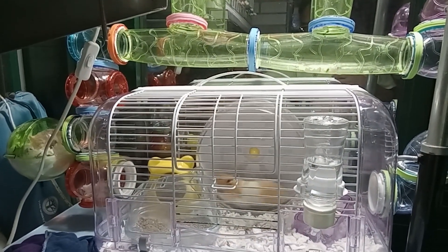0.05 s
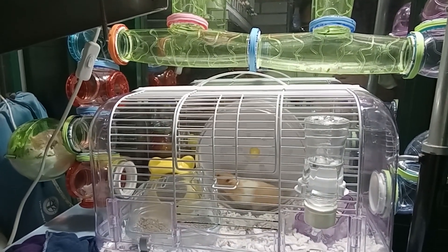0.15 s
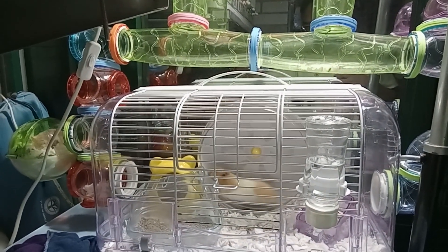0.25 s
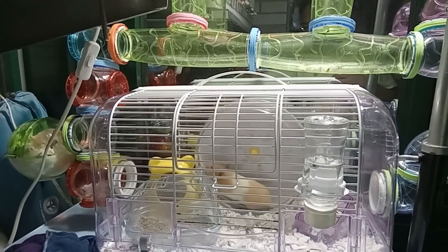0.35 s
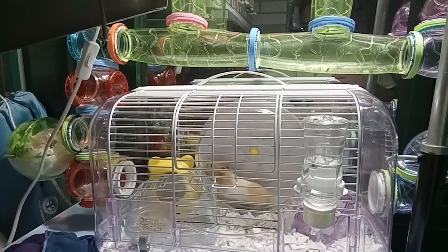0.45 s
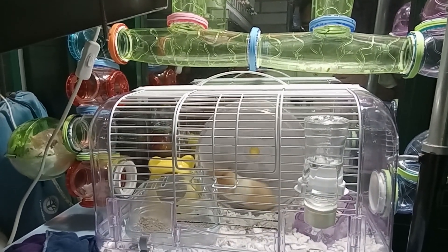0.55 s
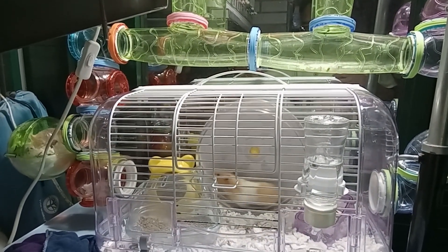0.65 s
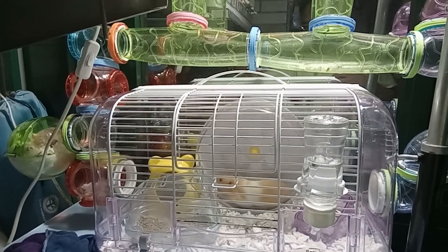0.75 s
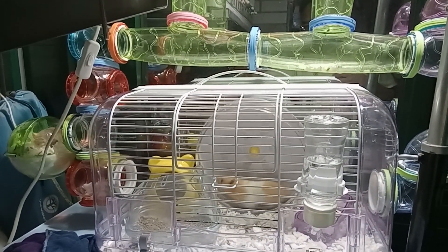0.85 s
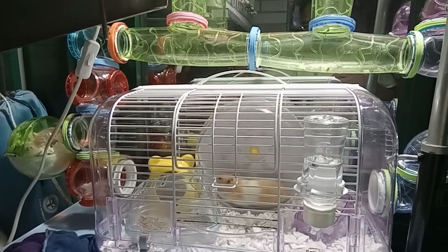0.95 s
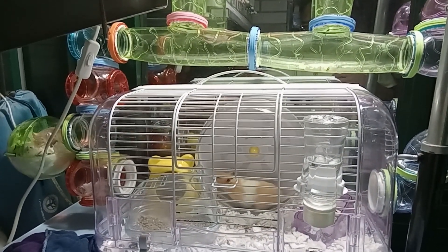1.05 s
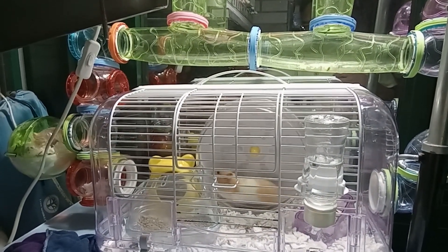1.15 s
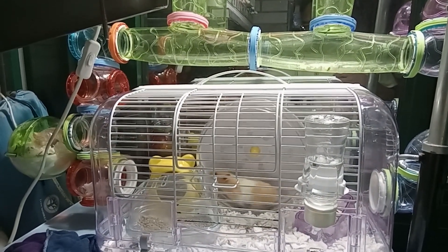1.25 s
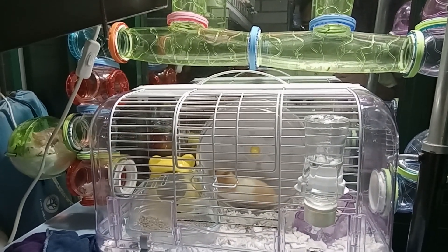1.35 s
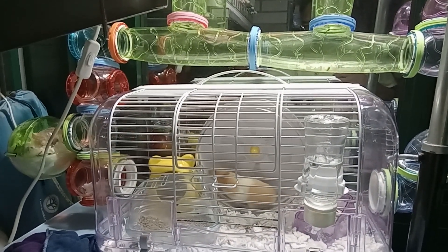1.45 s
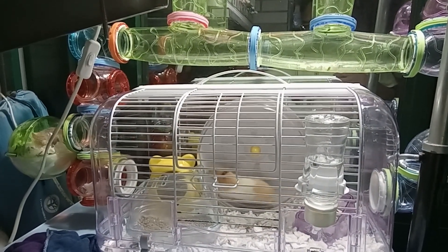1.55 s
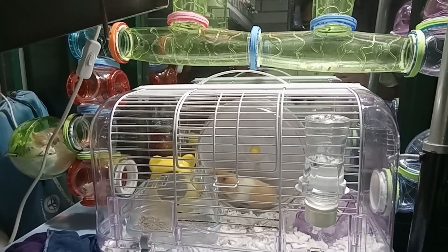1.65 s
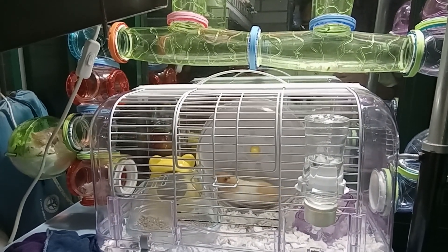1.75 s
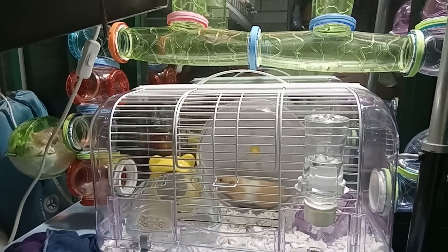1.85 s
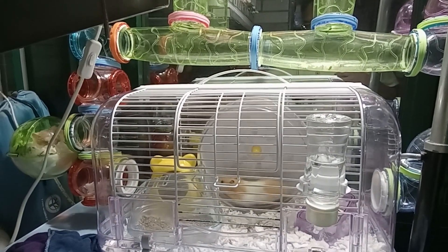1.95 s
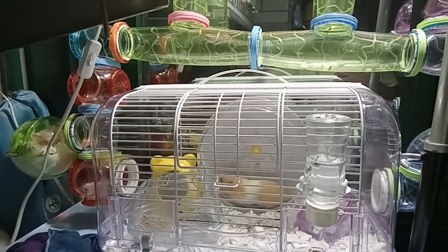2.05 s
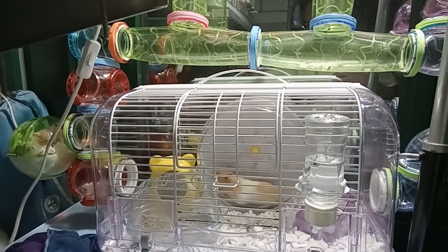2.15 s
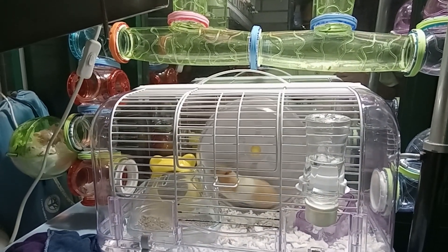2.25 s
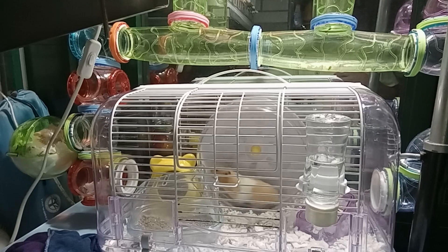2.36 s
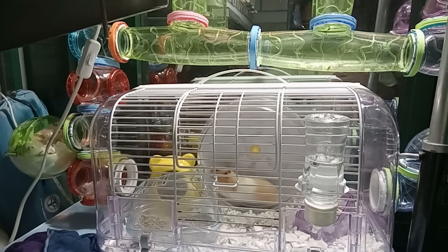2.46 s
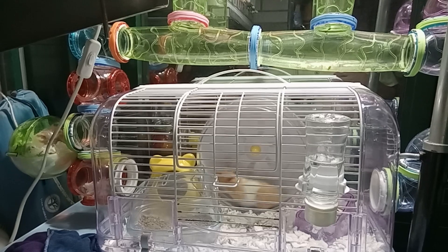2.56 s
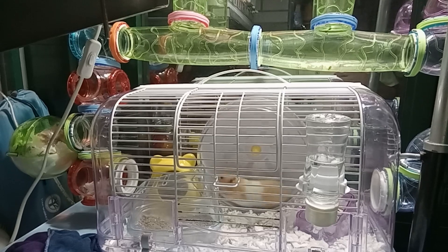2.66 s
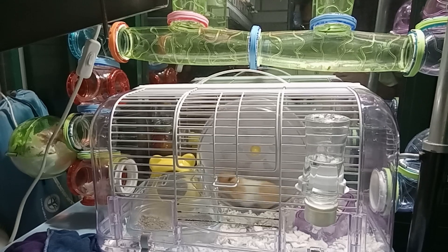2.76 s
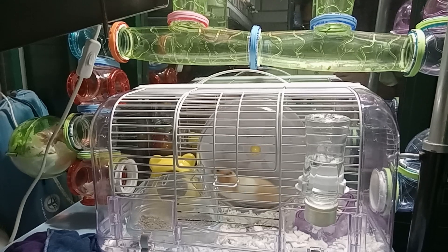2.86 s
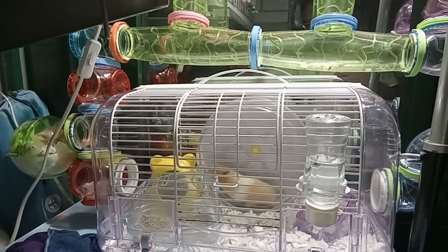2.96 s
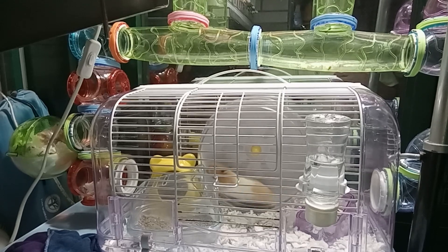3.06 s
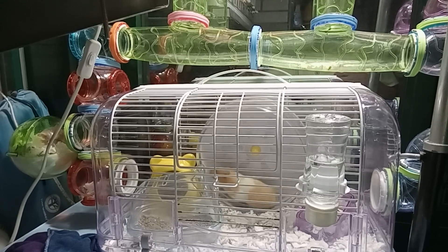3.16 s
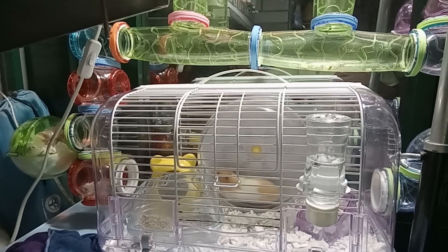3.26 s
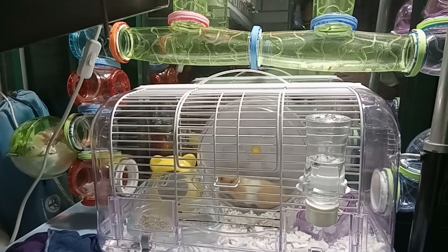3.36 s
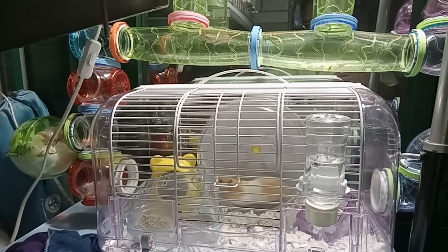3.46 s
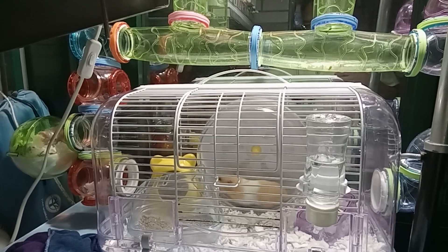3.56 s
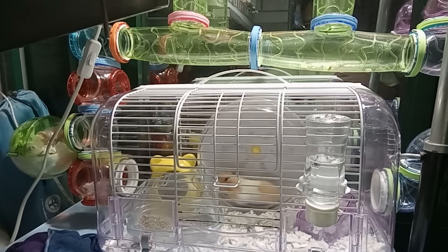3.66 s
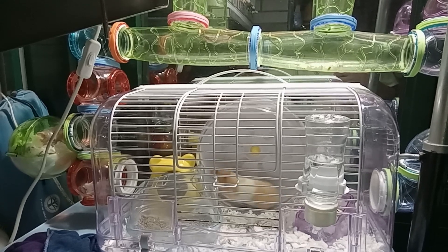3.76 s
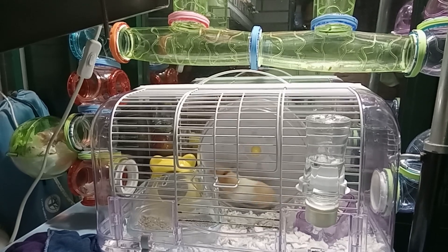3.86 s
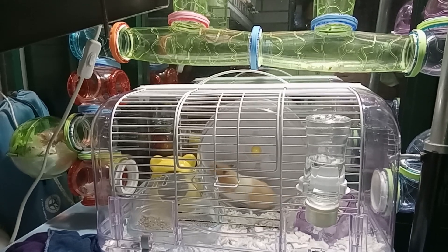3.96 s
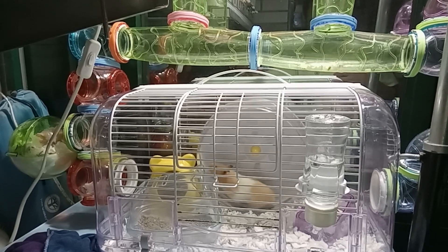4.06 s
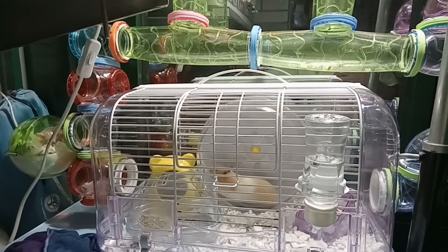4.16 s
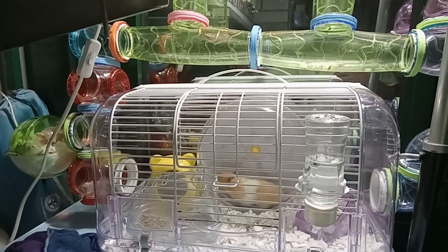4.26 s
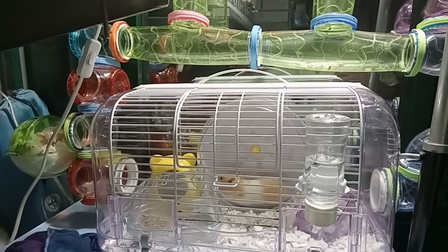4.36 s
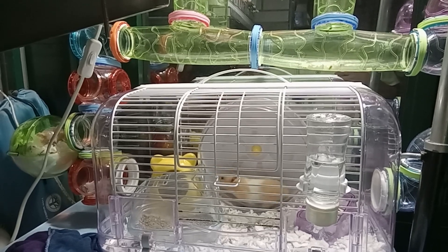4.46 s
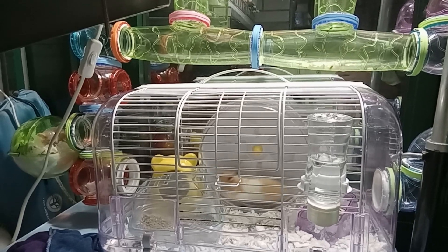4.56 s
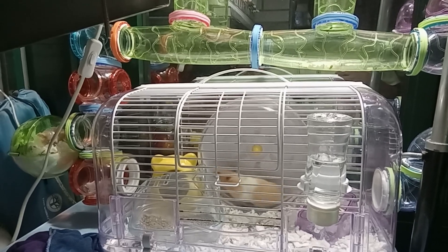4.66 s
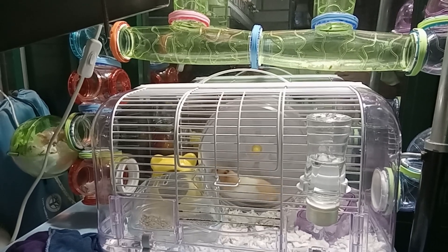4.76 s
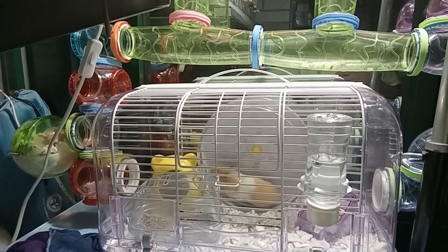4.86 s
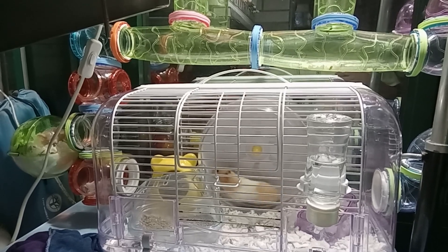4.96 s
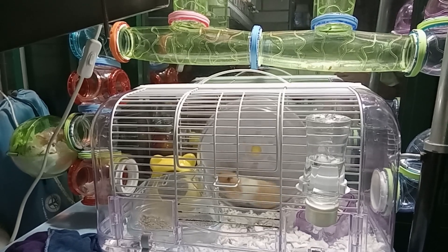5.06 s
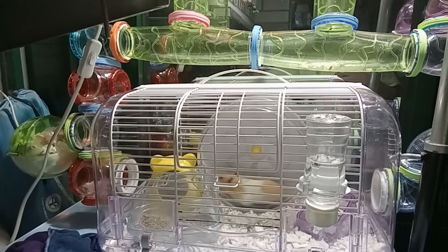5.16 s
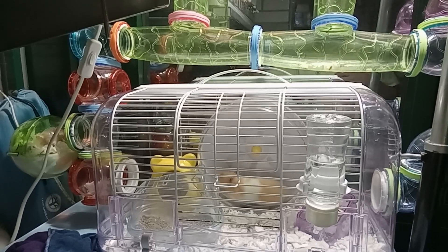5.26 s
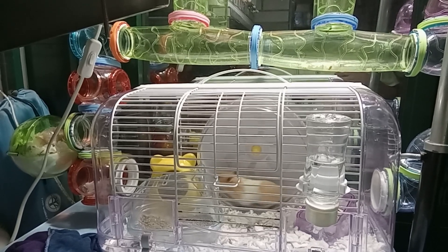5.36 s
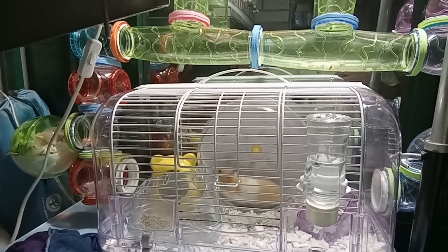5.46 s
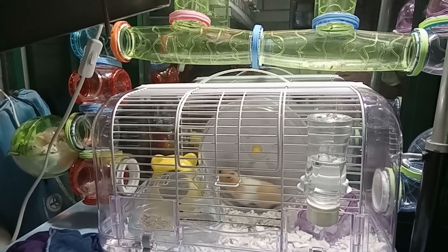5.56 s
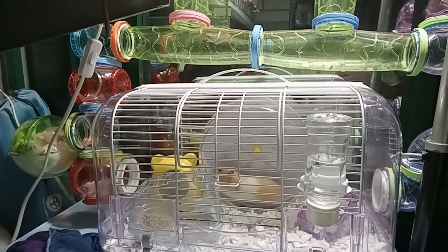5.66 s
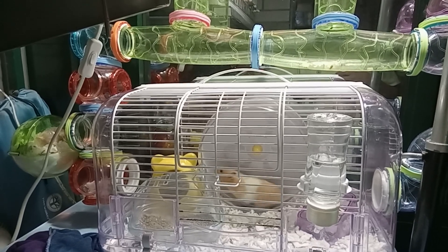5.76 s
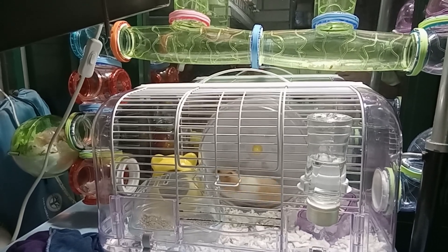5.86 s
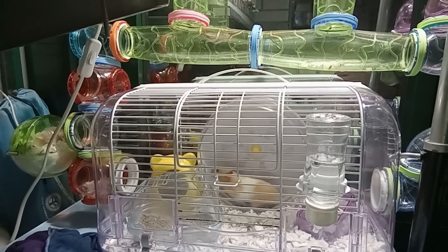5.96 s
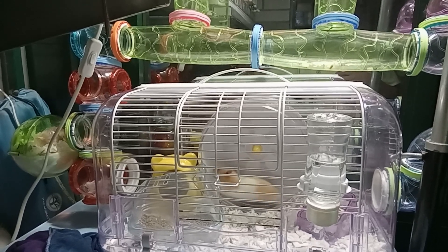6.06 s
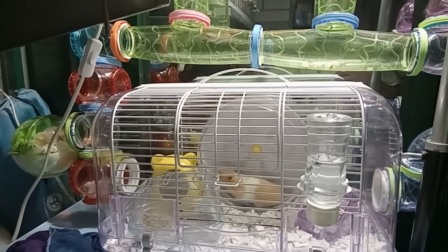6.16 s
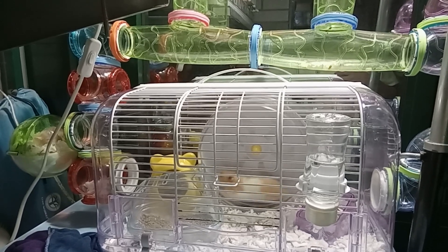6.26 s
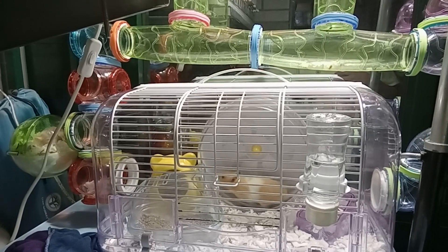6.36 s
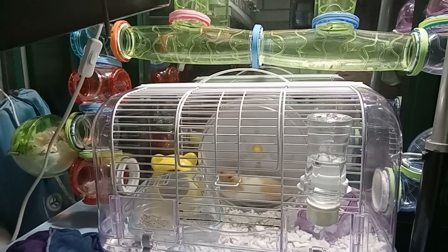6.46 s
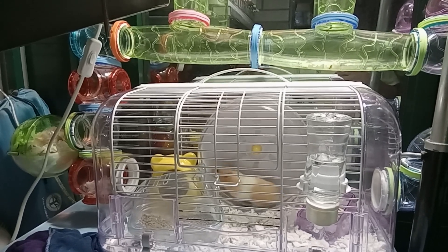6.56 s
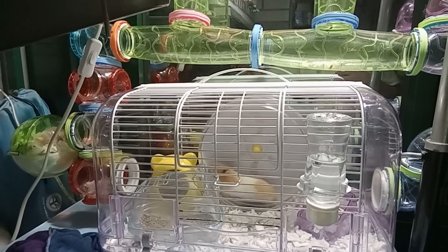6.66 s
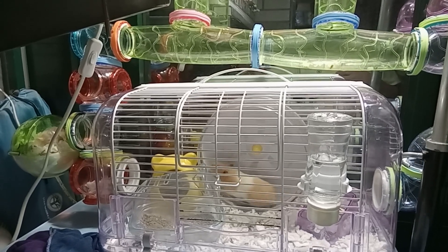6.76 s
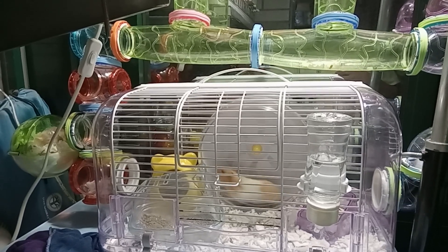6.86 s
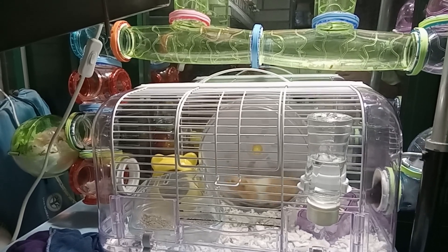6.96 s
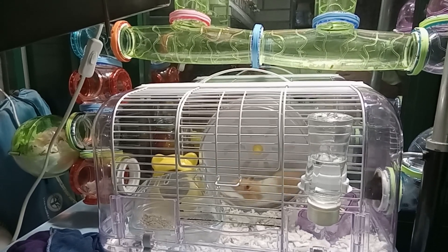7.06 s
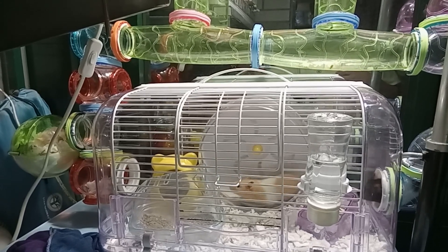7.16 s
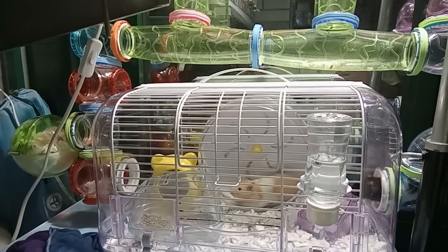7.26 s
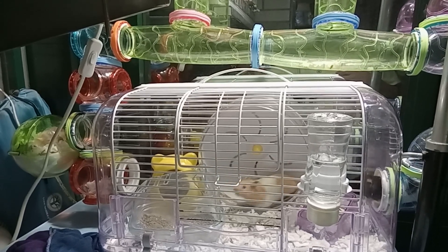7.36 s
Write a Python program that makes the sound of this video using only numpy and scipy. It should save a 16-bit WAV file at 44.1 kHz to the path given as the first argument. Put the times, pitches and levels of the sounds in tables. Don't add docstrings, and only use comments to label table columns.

```python
import sys
import numpy as np
from scipy import signal
from scipy.io import wavfile
from scipy.ndimage import uniform_filter1d

SR = 44100
rng = np.random.default_rng(int(sys.argv[2]) if len(sys.argv) > 2 else 0)


def wav_out(sig):
    wavfile.write(sys.argv[1], SR, np.round(np.clip(np.atleast_2d(sig).T, -1, 1) * 32767).astype(np.int16))


def to_linear_factor(level_db):
    exponent = np.asarray(level_db, float) / 20
    return 10 ** exponent


N = 327209
T = np.arange(N) / SR

# frequency [Hz], level [dB].
ROOM_AIR = [(25, -95), (110, -63), (250, -71), (600, -75), (1200, -71), (2750, -80), (4700, -89),
            (6700, -86), (8300, -84), (9600, -90), (10600, -94), (16000, -95)]
# time [s], frequency [Hz], level [dB].
TRAY_RING = [
    (7.12, 476, -78),
    (7.19, 472, -69),
    (7.29, 474, -64),
    (7.37, 466, -64),
    (7.42, 458, -78),
]
# frequency [Hz], width [Hz], level [dB].
CAGE_MODES = [(68.5, 5.8, -13), (125.5, 10, -11), (132.2, 5.1, 4.5), (181.3, 10.2, 2), (224.4, 23, -0.5),
              (302, 33, -3.5), (338.5, 25, -2)]
# frequency [Hz], t60 [s], rise [s].
TRAY_PARTS = [
    (121, 0.18, 0.0092),
    (340.8, 0.22, 0.0024),
    (475, 0.051, 0.0015),
]
# start [s], base, floor and rim levels [dB].
THUMPS = [(0.005, -56, -47, -57), (0.155, -53, -47, -51), (0.237, -46, -43, -34), (0.347, -58, -43, -55),
          (0.516, -51, -39, -48), (0.581, -39, -41, -51), (0.69, -42, -46, -36), (0.78, -37, -42.5, -44),
          (0.897, -52, -46, -48), (0.978, -41, -45, -32), (1.076, -55, -39.5, -35), (1.156, -46, -51, -31),
          (1.248, -43, -52, -36), (1.333, -44, -52, -43), (1.538, -38, -44.5, -37),
          (1.643, -36, -41.5, -43), (1.736, -41, -45, -44), (1.825, -53, -48, -32.5),
          (1.905, -42, -48, -47), (2.095, -45, -44, -33), (2.382, -64, -45, -36), (2.559, -42, -43, -30.5),
          (2.788, -56, -47, -57), (2.864, -43, -44, -37), (3.028, -35, -40.5, -39),
          (3.139, -36.5, -40.5, -48), (3.321, -37, -47, -39), (3.611, -51, -43, -34),
          (3.708, -45, -38, -40), (3.978, -40, -43, -35), (4.086, -45, -41.5, -51),
          (4.272, -62, -49, -33.5), (4.356, -54, -55, -38), (4.645, -50, -43, -55), (4.833, -36, -42, -40),
          (4.9, -35, -40, -34), (5.006, -55, -51, -37), (5.203, -37, -46.5, -34), (5.289, -43, -43, -43),
          (5.391, -43, -44, -42), (5.471, -46, -50, -37), (5.574, -46, -41, -53), (5.767, -49, -42.5, -33),
          (6.045, -40, -42.5, -35), (6.24, -40, -47, -49), (6.34, -38, -43, -28), (6.429, -55, -41, -56),
          (6.624, -41, -40.5, -50), (6.737, -60, -42, -50), (6.913, -36.5, -38.5, -33),
          (2.686, -60, -46, -56),
    (2.968, -48, -40.5, -41),
    (5.99, -48, -44.5, -55),
    (6.148, -44, -39, -44),
    (7.26, -59, -55, -50),
]
# frequency [Hz], level [dB].
WIRE_TONES = [(5120, 1.5), (10200, -11.5)]
# start [s], ping level [dB].
PINGS = [(1.158, -28), (1.826, -31), (3.611, -36), (4.274, -29), (4.357, -28), (5.29, -41), (5.471, -36),
         (5.858, -37), (6.045, -43), (6.34, -29), (6.914, -28)]
# start [s], rasp level [dB], fizz level [dB].
SCUFFS = [(0.055, -46, -68), (0.132, -49, -72), (0.24, -43.5, -66), (0.352, -56, -54), (0.587, -56, -49),
          (0.778, -43, -70), (1.183, -51, -66), (1.299, -49, -69), (1.457, -54, -73), (1.543, -48.5, -59),
          (2.208, -57, -54), (2.444, -53, -68), (2.688, -60, -54), (2.795, -58, -53), (2.874, -52, -57),
          (3.138, -42, -61), (3.344, -58, -54), (3.448, -54, -54), (3.539, -51, -52), (3.827, -49, -55),
          (3.909, -69, -53), (3.978, -43, -62), (3.992, -57, -64), (4.087, -55, -54), (4.118, -53, -67),
          (4.317, -46, -72), (4.374, -44, -54), (4.538, -57, -57), (4.653, -51, -55), (4.857, -51, -73),
          (5.083, -51, -60), (5.485, -50, -56), (5.593, -55, -60), (6.169, -53, -52), (6.636, -58, -54),
          (6.656, -60, -59), (6.962, -51, -57), (7.26, -66, -56)]
# frequency [Hz], density [dB per Hz].
RASP_COLOUR = [(2000, -33), (3200, 11), (5200, 6), (7200, -3), (9000, -10), (12000, -23)]
# frequency [Hz], density [dB per Hz].
FIZZ_COLOUR = [(6000, -22), (8500, 5), (10000, -1), (13000, -7), (16000, -11)]
# start [s], level [dB].
NICKS = [(0.028, -36), (0.049, -42.5), (0.203, -51), (0.731, -45), (1.023, -44), (1.116, -48), (1.154, -44),
         (1.171, -46), (1.181, -50), (1.24, -52), (1.262, -48), (1.453, -44.5), (1.659, -35.5),
         (1.874, -46), (1.898, -50), (2.144, -52), (2.267, -52), (2.277, -54), (2.397, -41), (2.576, -46),
         (2.866, -44), (2.904, -49), (2.96, -51), (2.977, -36), (3.163, -45), (3.179, -41), (3.207, -42),
         (3.371, -52), (3.478, -52), (3.65, -47), (3.985, -39.5), (4.022, -50), (4.38, -44), (4.417, -48),
         (4.446, -43), (4.461, -55), (5.208, -34.5), (5.218, -54), (5.251, -61), (5.336, -45), (5.401, -45),
         (5.439, -50), (5.515, -50), (5.815, -52), (5.91, -51), (5.955, -54), (6.062, -49), (6.415, -50),
         (6.442, -44), (6.67, -51), (6.738, -46), (6.968, -47)]
# start [s], crack level [dB].
TICKS = [(.1116, -45), (.3326, -36), (.4589, -36.5), (.953, -49), (1.5743, -38), (2.071, -38), (2.151, -35),
         (2.3521, -36), (2.827, -31.5), (3.253, -35), (3.953, -43), (4.5855, -32.5), (4.6154, -35),
         (5.1607, -40), (5.3797, -31), (5.432, -33), (5.637, -32), (5.8411, -42), (5.931, -33),
         (6.314, -37), (6.537, -40), (6.72, -31.5), (6.884, -39), (7.101, -43), (7.121, -40), (7.1496, -42),
         (7.171, -35.5), (7.1955, -46), (7.227, -41)]
# start [s], crack level [dB].
GRAZES = [(1.897, -38), (2.318, -39), (2.53, -40), (2.655, -37), (2.775, -52), (2.851, -38), (2.943, -43),
          (3.075, -36), (3.314, -36), (3.411, -33), (3.649, -35), (3.7, -39), (4.23, -41), (4.267, -45),
          (4.94, -36), (4.959, -43), (5.258, -46), (5.277, -35), (5.36, -38), (5.462, -42), (5.506, -34),
          (5.564, -40), (6.613, -35), (6.854, -46)]
# frequency [Hz], density [dB per Hz].
CLAW_COLOUR = [(2500, -45), (4500, -18), (6500, -7), (8500, -1), (10800, -8), (15500, -13), (16500, -24)]
# start [s], level [dB].
SLAPS = [
    (0.405, -37),
    (1.784, -43),
    (1.867, -34),
    (2.602, -32.5),
    (2.657, -36.5),
    (5.688, -41),
    (6.416, -36),
    (6.653, -36),
]
# start [s], level [dB].
HOPS = [(0.028, -29.5), (0.048, -29), (0.065, -35), (0.111, -31), (0.128, -34), (0.196, -38), (0.346, -39),
        (0.533, -39), (0.723, -30), (0.742, -36), (0.764, -39), (1.016, -31), (1.155, -33), (1.175, -40),
        (1.666, -35), (1.867, -37), (1.914, -28), (2.244, -39.5), (2.384, -30), (2.541, -40), (2.558, -44),
        (2.594, -29), (2.896, -30), (3.032, -43), (3.167, -30), (3.185, -29), (3.2, -33), (3.217, -41),
        (3.575, -38), (3.628, -34), (3.778, -27.5), (3.806, -36), (3.824, -30.5), (4.086, -34.5),
        (4.131, -36), (4.294, -37), (4.315, -32), (4.328, -31), (4.36, -29), (4.383, -30), (4.405, -27.5),
        (4.647, -37.5), (4.731, -34), (4.832, -30.5), (4.851, -38), (4.896, -41), (5.007, -29),
        (5.033, -34), (5.201, -42), (5.289, -33.5), (5.432, -41), (5.477, -30), (5.77, -43), (5.808, -40),
        (5.858, -33), (6.052, -36), (6.339, -36), (6.737, -38), (6.932, -34), (6.948, -29), (6.967, -34),
        (7.195, -60)]
# frequency [Hz], width [Hz], level [dB].
HUB_MODES = [(1540, 24, -9), (1836, 95, 9), (2075, 89, -2.5), (2313, 17, 5), (2740, 65, -19)]
# start [s], crack level [dB], drum level [dB], chatter t60 [s].
SLAMS = [(.154, -13, -29.5, 0.1), (0.5166, -12, -24, 0.14), (0.6902, -8.5, -26, 0.12),
         (0.979, -10.5, -29.5, 0.21), (1.076, -12.5, -22.5, 0.11), (1.156, -14.5, -30, 0.19),
         (1.247, -10, -27.5, 0.11), (1.642, -14.5, -28, 0.14), (1.824, -10, -28.5, 0.31),
         (1.9043, -14.5, -29.5, 0.18), (2.38, -15.5, -27.5, 0.21), (2.559, -11, -27.5, 0.21),
         (2.8631, -13, -28, 0.15), (3.321, -11, -25.5, 0.1), (3.7058, -16, -26, 0.19),
         (3.7748, -15, -29.5, 0.22), (3.9777, -17.5, -27, 0.091), (4.2717, -10.5, -28, 0.2),
         (4.356, -13, -31, 0.22), (4.833, -11, -28.5, 0.18), (5.002, -13.5, -28.5, 0.14),
         (5.033, -12.5, -30, 0.24), (5.202, -16, -29, 0.09), (5.47, -15, -24.5, 0.12),
         (5.5724, -15.5, -28, 0.13), (5.7653, -12, -24, 0.094), (5.8564, -12.5, -24, 0.087),
         (6.339, -11, -27.5, 0.22), (6.624, -11, -28.5, 0.16), (6.9122, -9, -27, 0.2)]
# start [s], crack level [dB], drum level [dB], chatter t60 [s].
KNOCKS = [(0.021, -23, -37, 0.16), (0.236, -23.5, -29.5, 0.1), (0.347, -26, -33, 0.14),
          (0.581, -19.5, -30, 0.19), (0.765, -25, -37, 0.095), (1.536, -26.5, -33.5, 0.11),
          (1.683, -26, -29, 0.076), (2.095, -17.5, -25.5, 0.1), (2.2103, -31, -32.5, 0.068),
          (2.458, -22.5, -28, 0.1), (2.786, -28.5, -31, 0.08), (2.901, -25, -34.5, 0.077),
          (2.9686, -19, -27, 0.16), (3.136, -18.5, -29.5, 0.21), (3.1686, -22, -30.5, 0.24),
          (3.2001, -24, -38, 0.26), (3.437, -26, -35.5, 0.24), (3.535, -31, -32.5, 0.088),
          (3.6092, -16, -27, 0.15), (3.8087, -20.5, -31, 0.13), (4.085, -19.5, -36, 0.22),
          (4.4452, -18, -29.5, 0.098), (4.6487, -27, -32.5, 0.093), (4.724, -24, -28.5, 0.074),
          (5.288, -16, -27.5, 0.14), (6.044, -16, -25, 0.12), (6.149, -25, -29.5, 0.2),
          (6.239, -17, -30.5, 0.13), (6.4293, -19, -23, 0.071), (6.9508, -17, -31, 0.18)]
# start [s], crack level [dB], drum level [dB].
PATS = [(.0014, -49, -29.5), (.051, -34, -28.5), (0.09, -49, -34), (0.126, -35, -42), (0.401, -54, -35),
        (0.509, -45, -40), (0.779, -24, -28), (.895, -30, -30.5), (1.333, -30, -32), (1.453, -41, -30),
        (1.7372, -29, -30), (1.867, -38, -36), (2.035, -54, -34), (2.537, -51, -45), (2.6857, -29, -35.5),
        (3.03, -49, -30), (3.5198, -27.5, -44), (4.351, -26, -28), (4.5397, -28, -28.5), (4.705, -32, -36),
        (4.893, -30, -27.5), (5.109, -50, -37.5), (5.39, -32, -28), (5.66, -40, -29.5), (6.554, -26, -29.5),
        (6.66, -21.5, -32), (6.7406, -23.5, -28.5), (6.9874, -26.5, -29), (7.036, -30, -29.5),
        (7.258, -34, -42.5)]
# start [s], crack level [dB], drum level [dB].
REBOUNDS = [(.2758, -37, -51), (.674, -42, -40.5), (.721, -43, -30.5), (.9368, -36, -42),
            (1.192, -42, -33.5), (1.276, -52, -32), (1.932, -23, -30), (2.188, -34, -43.5),
            (2.239, -33, -44), (2.2745, -30, -35), (2.446, -38, -40), (2.636, -30, -40.5), (3.37, -40, -44),
            (3.395, -39, -37.5), (3.574, -31, -47), (3.888, -30, -39.5), (4.071, -38, -38),
            (4.12, -31, -35), (4.18, -35, -41), (4.315, -32, -35), (4.387, -31, -34.5), (4.403, -43, -32),
            (4.634, -32, -43.5), (4.686, -31, -40), (4.762, -32.5, -45), (5.978, -23.5, -37.5),
            (6.4153, -41, -47), (6.5895, -33, -42), (6.798, -37.5, -46.5)]
# time [s], level [dB].
ROLL = [(0, -9), (.3, -29), (.8, -35.5), (1.3, -37), (1.6, -26.5), (2.05, -40), (2.6, -33), (3.05, -30),
        (3.4, -37), (3.9, -51), (4.35, -42), (4.9, -31.5), (5.5, -33), (6.15, -26.5), (6.55, -33),
        (6.9, -39), (7.12, -52), (7.25, -44), (7.42, -71)]
# frequency [Hz], width [Hz], level [dB].
DRUM_MODES = [(344, 30, -9), (518, 35, -7), (790, 90, -6), (958, 55, -2), (1159, 60, -5), (1336, 120, -6),
              (1502, 45, -5), (1610, 70, -8), (1845, 85, 1), (1994, 60, -4), (2200, 110, -5),
              (2502, 70, -7), (2863, 90, -11), (3140, 150, -14)]
# frequency [Hz], density [dB per Hz].
DRUM_BROAD = [(90, -75), (250, -4.5), (400, -8.5), (520, 2), (640, -11), (760, 2), (1500, -2), (2000, -4.5),
              (2600, -9.5), (3250, -16), (3600, -19), (9000, -23), (14000, -39)]
# frequency [Hz], density [dB per Hz].
CRACK_COLOUR = [(1500, -7.5), (2500, 0.5), (4200, -10), (5200, -4.5), (6800, -6), (8500, -3),
                (10800, -24.5), (15500, -28), (16500, -23)]


def evened(x):
    return x / np.sqrt(np.mean(x ** 2) + 1e-20)


def colour(x, points):
    hz = np.abs(np.fft.fftfreq(4096, 1 / SR))
    f, db = np.transpose(points)
    level_db = np.interp(np.log(hz + 1), np.log(f + 1), db)
    log_gain = np.log(to_linear_factor(np.maximum(level_db, -100)))
    taps = np.fft.ifft(np.exp(np.conj(signal.hilbert(log_gain)))).real[:2048]
    return signal.oaconvolve(x, taps / np.linalg.norm(taps))[:N]


def resonate(x, hz, width):
    turn = np.exp(2j * np.pi * np.cumsum(hz * np.ones(N)) / SR)
    r = np.exp(-np.pi * width / SR)
    return 2 * (turn * signal.lfilter([1 - r], [1, -r], x / turn)).real


def modes(x, table, sign=-1):
    t = T[:SR // 4]
    taps = np.zeros(len(t))
    for k, (hz, width, db) in enumerate(table):
        decay = width * np.exp(-np.pi * width * t)
        taps += sign ** k * to_linear_factor(db) * decay * np.sin(2 * np.pi * hz * t)
    return signal.oaconvolve(x, taps / np.linalg.norm(taps))[:N]


def above(x, hz):
    return signal.lfilter(*signal.butter(2, hz / (SR / 2), "high"), x)


def chatter(per_s, spread_db):
    size = to_linear_factor(spread_db * np.minimum(rng.exponential(1, N), 4))
    return evened(size * rng.choice([-1., 1.], N) * (rng.random(N) < per_s / SR))


def blows(when, level_db, t60, rise):
    power = np.zeros(N)
    for s, db, fall in zip(when, level_db, np.clip(t60, .01, .4) * np.ones(len(when))):
        part = power[round(s * SR):][:round(fall * SR)]
        t = T[:len(part)]
        part += (to_linear_factor(db - 60 * t / fall) * (1 - np.exp(-t / rise))) ** 2
    return np.sqrt(power)


def contacts():
    pats = [(*row, 0.081) for row in PATS]
    rebounds = [(*row, 0.18) for row in REBOUNDS]
    ticks = [(s, db - 5.0, db - 9, 0.068) for s, db in TICKS]
    grazes = [(s, db, db - 18, 0.068) for s, db in GRAZES]
    return np.transpose(SLAMS + KNOCKS + pats + rebounds + ticks + grazes)


def quiet():
    s, hz, db = np.transpose(TRAY_RING)
    phase = 2 * np.pi * np.cumsum(np.interp(T, s, hz)) / SR
    ring = np.sqrt(2) * np.sin(phase) * to_linear_factor(np.interp(T, s, db, -120))
    ring *= 1 - .6 * np.sin(2 * np.pi * 10.0 * (T - 7.22))
    whine_hz, whine_width_hz = 3950, 600
    whine = resonate(rng.standard_normal(N), whine_hz, whine_width_hz)
    whine = resonate(whine, whine_hz, whine_width_hz)
    air = colour(rng.standard_normal(N), ROOM_AIR)
    return to_linear_factor(-66.5) * air + ring + to_linear_factor(-74.5) * evened(whine)


def room(x):
    n = SR // 2
    taps = rng.choice([-1., 1.], n) * (rng.random(n) < 2000 / SR) * (T[:n] > .004)
    hz, t, z = signal.stft(taps, SR, nperseg=256)
    t60 = np.interp(hz, [200, 2000, 9000], [.45, .35, .2])[:, None]
    tail = signal.istft(z * to_linear_factor(-60 * t / t60), SR, nperseg=256)[1]
    return signal.oaconvolve(x, tail / np.linalg.norm(tail))[:N]


def cage():
    coast_s, coast_db_per_s = 7.1, -52
    roll = to_linear_factor(-60 + coast_db_per_s * np.maximum(T - coast_s, 0))
    s, _, drum_db, _ = contacts()
    thud = blows(s, drum_db - 17.0, 0.27, 0.00081)
    return modes((roll + thud) * chatter(3000, 0.87), CAGE_MODES, sign=0.99)


def tray():
    out, t = np.zeros(N + SR), T[:SR // 4]
    landings = THUMPS
    detune = 1 + 0.023 * rng.uniform(-1.5, 1, (len(landings), len(TRAY_PARTS)))
    for (s, *levels_db), ratios in zip(landings, detune):
        for db, (hz, t60, rise), ratio in zip(levels_db, TRAY_PARTS, ratios):
            swell = to_linear_factor(db + 4.5 - 60 * t / t60) * (1 - np.exp(-t / rise)) ** 2
            out[round(s * SR):][:len(t)] += swell * np.sin(2 * np.pi * hz * ratio * t)
    return out[:N]


def wire():
    s, ping_db = np.transpose(PINGS)
    ring = blows(s, ping_db + 27, .018, .014)
    ring += to_linear_factor(-13.0) * np.roll(ring, round(.016 * SR))
    drift = 1 + .016 * evened(uniform_filter1d(rng.standard_normal(N), size=200))
    turns = np.cumsum(drift) / SR
    return ring * sum(to_linear_factor(db) * np.sin(2 * np.pi * hz * turns) for hz, db in WIRE_TONES)


def scuffs():
    s, rasp_db, fizz_db = np.transpose(SCUFFS)
    rasp = blows(s, rasp_db + 8.5, 0.042, 0.0022) * chatter(5000, 1.4)
    fizz = blows(s, fizz_db + 5.0, 0.063, 0.0014) * chatter(7000, 2.5)
    return colour(rasp, RASP_COLOUR) + colour(fizz, FIZZ_COLOUR)


def nicks():
    out, t = np.zeros(N + SR), T[:SR // 40]
    for s, db in NICKS:
        hz = 2800 + 3400 * rng.random() ** 3
        t60 = 0.028 + 0.032 * rng.random()
        rough = uniform_filter1d(rng.standard_normal(len(t)), size=12) * 3.6
        swell = to_linear_factor(db + 6.0 - 60 * t / t60) * (1 - np.exp(-t / 0.00071))
        out[round(s * SR):][:len(t)] += swell * np.sin(2 * np.pi * hz * t) * rough
    return out[:N]


def claws():
    s, db = np.transpose(TICKS + GRAZES)
    scratch = colour(blows(s, db - 29.0, 0.12, 0.0017) * chatter(5000, 1.9), CLAW_COLOUR)
    bar_hz, bar_width_hz = 6400, 200
    return scratch + to_linear_factor(3) * resonate(scratch, bar_hz, bar_width_hz)


def slaps():
    s, slap_db = np.transpose(SLAPS)
    return modes(blows(s, slap_db + 3.0, 0.05, 0.0014) * chatter(9000, 1.2), DRUM_MODES[2:5])


def hub():
    s, hop_db = np.transpose(HOPS)
    hops = modes(blows(s, hop_db + 2.5, 0.052, 0.00067) * chatter(9000, 1.9), HUB_MODES)
    s, crack_db = np.transpose(SLAMS)[:2]
    snaps = blows(s, crack_db - 22.5, 0.014, 0.00046) * chatter(9100, 1.5)
    return hops + colour(snaps, FIZZ_COLOUR)


def bounces(per_s, t60, share):
    hops = rng.exponential(1, N) * (rng.random(N) < per_s / SR)
    fading = signal.lfilter([1], [1, -to_linear_factor(-60 / (t60 * SR))], hops)
    clumps = 1 - share + share * evened(fading)
    return clumps / np.sqrt(uniform_filter1d(clumps ** 2, size=900))


def turned(x, patchy_db):
    z = signal.stft(x, nperseg=128)[2]
    patches = uniform_filter1d(rng.standard_normal(z.shape), size=4, axis=0)
    patches = uniform_filter1d(patches, size=14, axis=1)
    gain = to_linear_factor(patchy_db * evened(patches))
    return signal.istft(z * evened(gain), nperseg=128)[1][:N]


def wheel():
    s, crack_db, drum_db, t60 = contacts()
    rub = to_linear_factor(np.interp(T, *np.transpose(ROLL)) - 23)
    hop = bounces(150, 0.062, 0.31)
    shake = (blows(s, drum_db + 3.0, t60, 0.0037) + rub) * hop
    drum = 0.43 * modes(shake * chatter(2500, 2.54), DRUM_MODES)
    drum += 0.5 * colour(shake * chatter(2500, 0.9), DRUM_BROAD)
    first = blows(s, crack_db - 14.5, 0.054, 0.0016) * hop
    lead = to_linear_factor(-21.5) * np.roll(first, -round(0.0022 * SR))
    rattle = hop * (blows(s, crack_db - 31.5, 0.71 * t60, 0.0075) + to_linear_factor(-17.5) * rub)
    crack = colour((first + lead + rattle) * chatter(7000, 3.9), CRACK_COLOUR)
    return turned(drum + crack, 0.96)


def scene():
    near = above(wheel(), 136) + cage() + above(tray(), 114) + above(hub(), 600) + scuffs()
    heard = near + wire() + to_linear_factor(-13.5) * room(near) + quiet() + claws()
    return (heard + nicks() + slaps())[None]


def low_pass(x):
    return signal.sosfilt(signal.butter(12, 16800, fs=SR, output="sos"), x)


def record(dry):
    port_hz, port_width_hz, edge_hz = 8560, 550, 15950
    x = dry + to_linear_factor(1.5) * resonate(dry[0], port_hz, port_width_hz)
    x = signal.lfilter(*signal.butter(3, 56 / (SR / 2), "high"), x)
    x = .21 * np.tanh(x / .21)
    edge = signal.firwin(511, edge_hz, fs=SR)
    edge += to_linear_factor(-28) * signal.firwin(511, edge_hz + 650, fs=SR)
    x = signal.oaconvolve(x, edge[None], "same")
    return low_pass(x)


dry = scene()
out = record(dry)
wav_out(out)
```